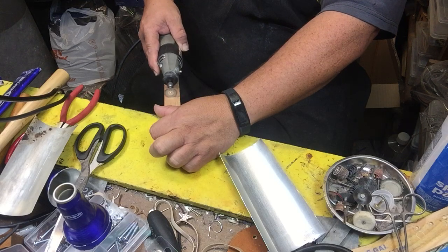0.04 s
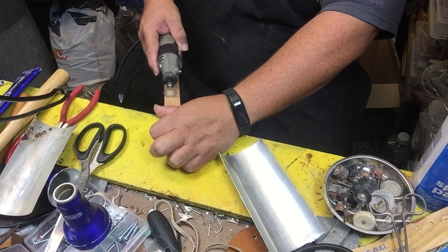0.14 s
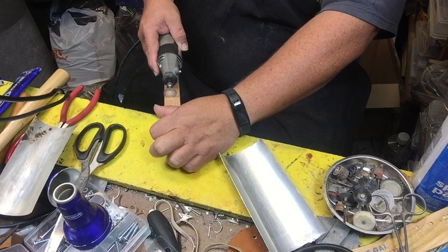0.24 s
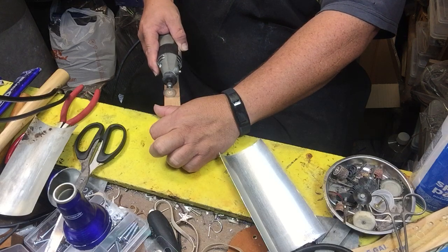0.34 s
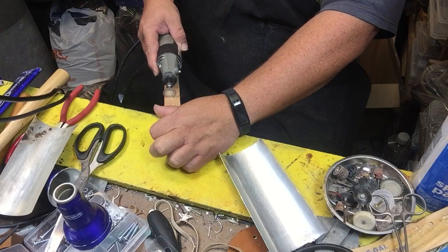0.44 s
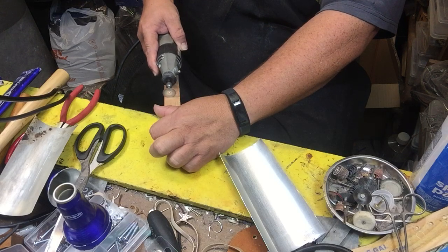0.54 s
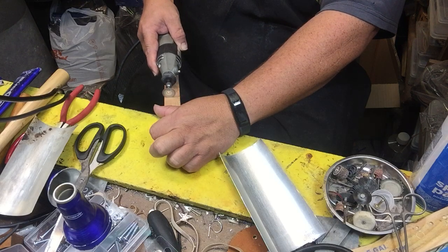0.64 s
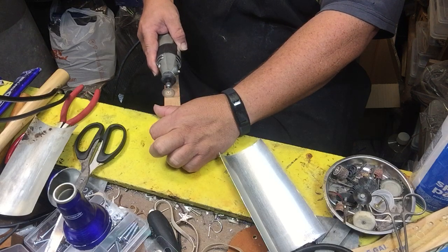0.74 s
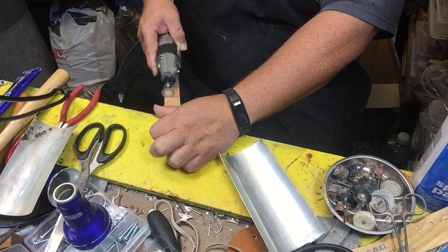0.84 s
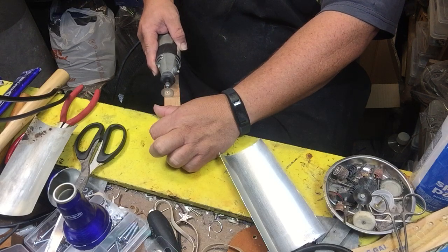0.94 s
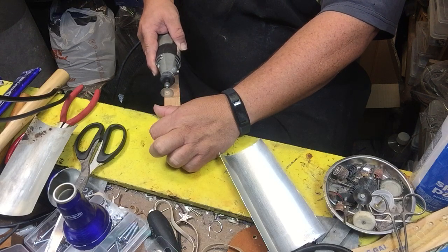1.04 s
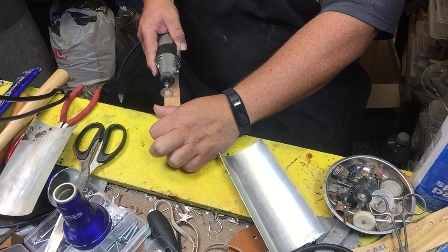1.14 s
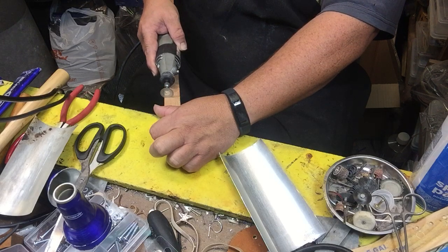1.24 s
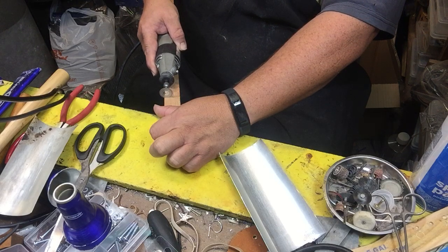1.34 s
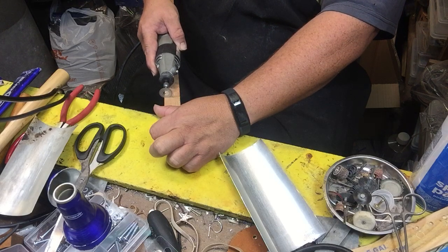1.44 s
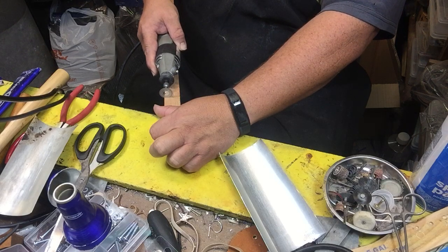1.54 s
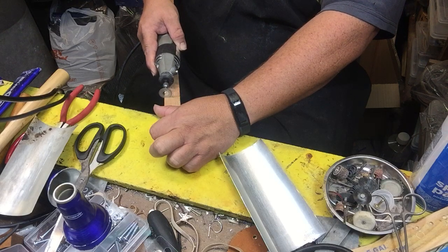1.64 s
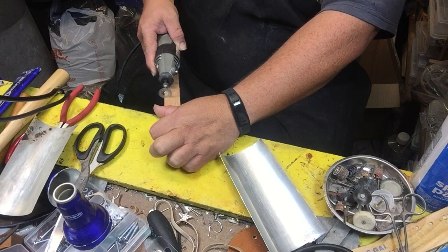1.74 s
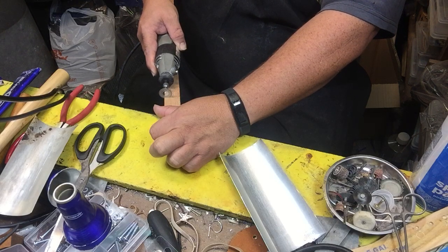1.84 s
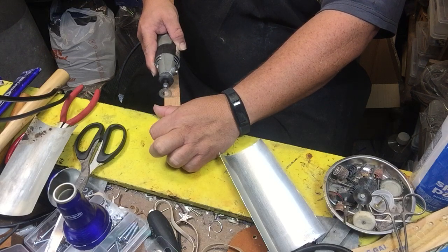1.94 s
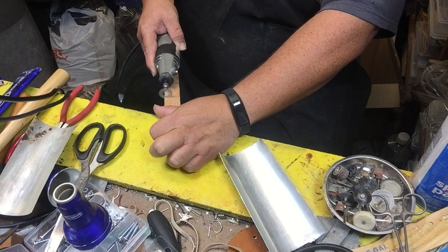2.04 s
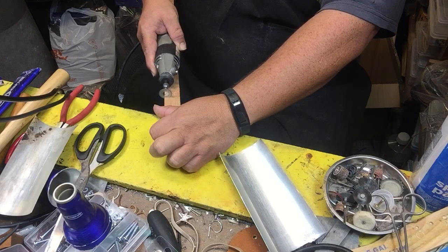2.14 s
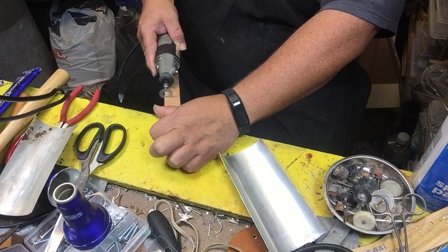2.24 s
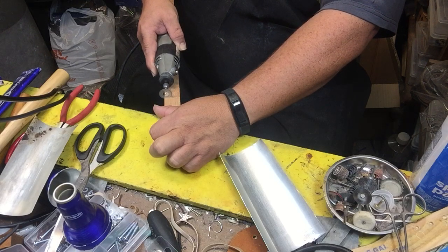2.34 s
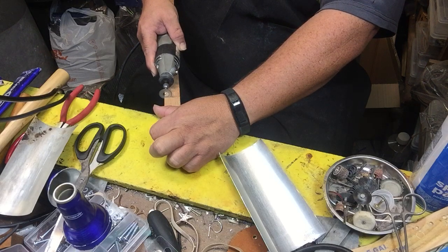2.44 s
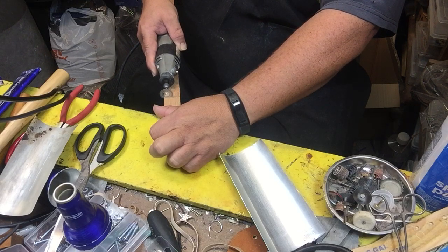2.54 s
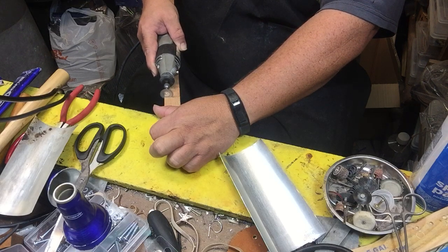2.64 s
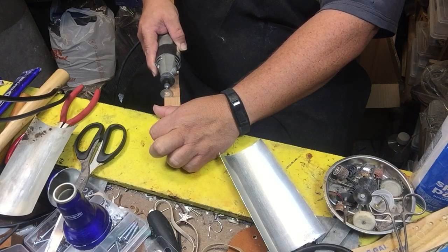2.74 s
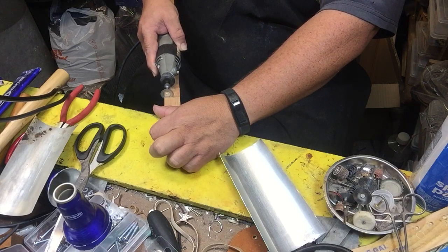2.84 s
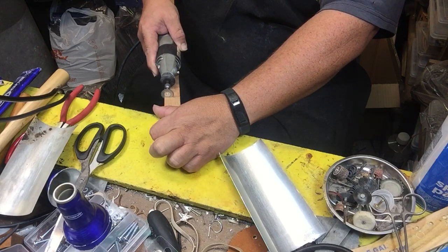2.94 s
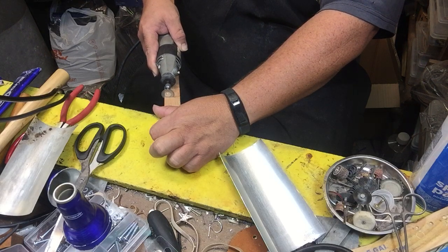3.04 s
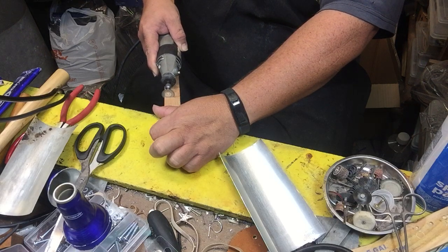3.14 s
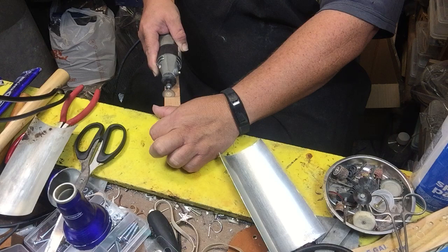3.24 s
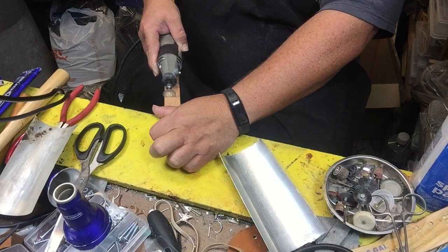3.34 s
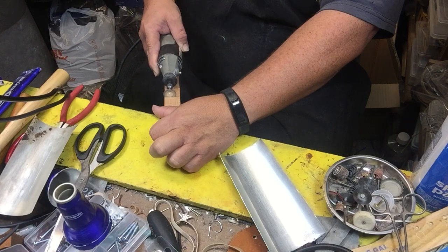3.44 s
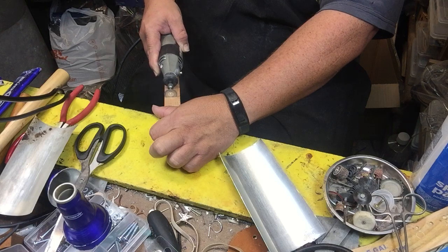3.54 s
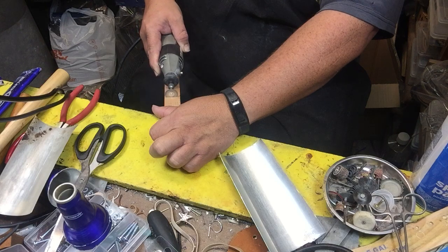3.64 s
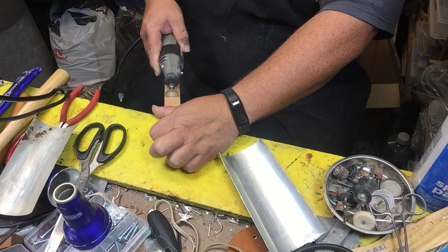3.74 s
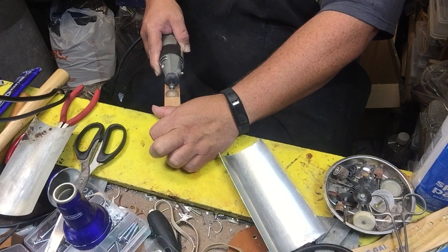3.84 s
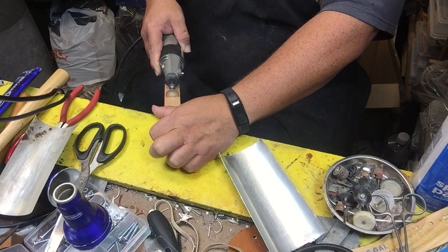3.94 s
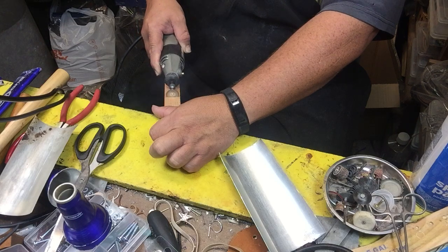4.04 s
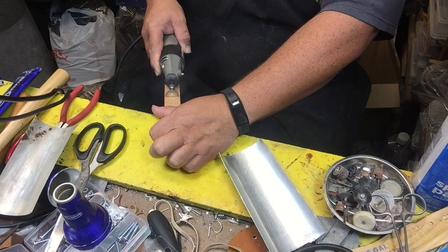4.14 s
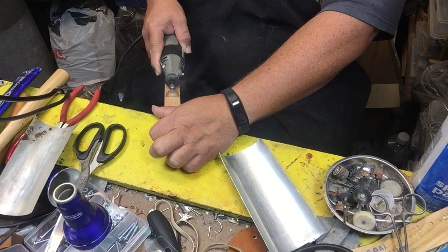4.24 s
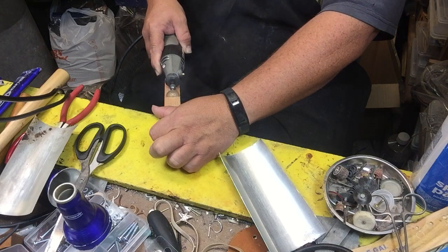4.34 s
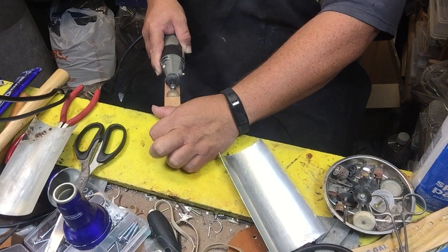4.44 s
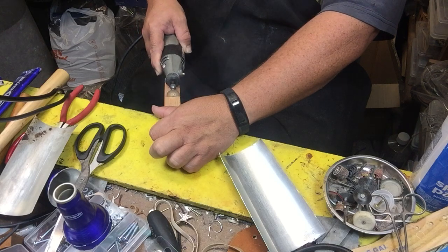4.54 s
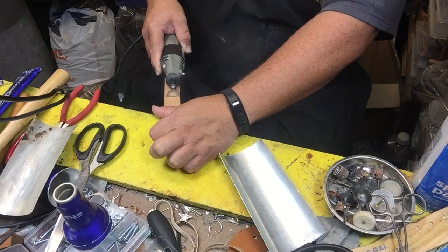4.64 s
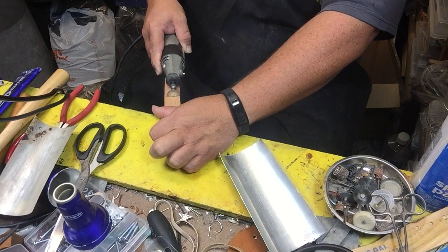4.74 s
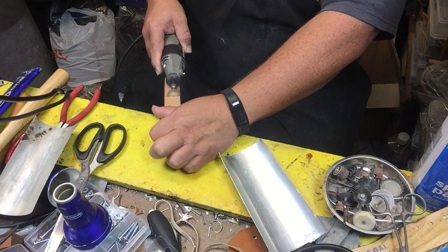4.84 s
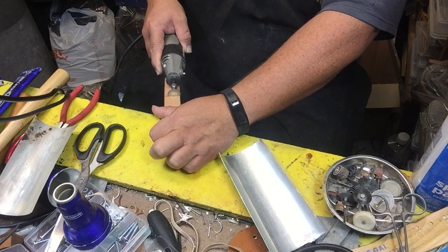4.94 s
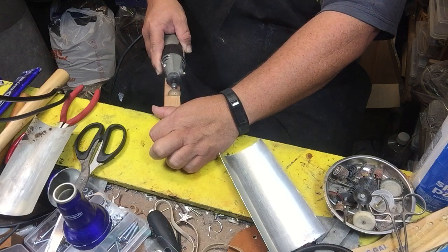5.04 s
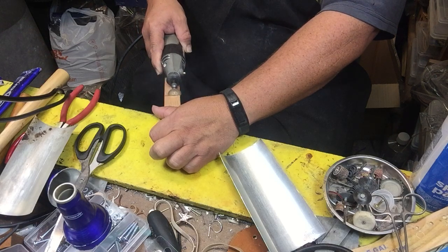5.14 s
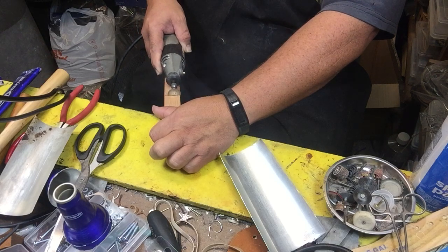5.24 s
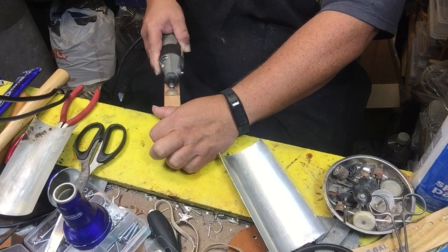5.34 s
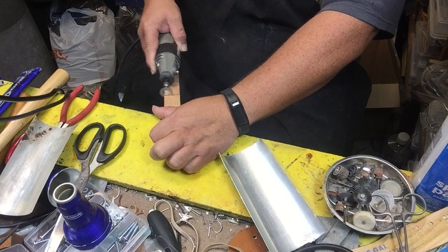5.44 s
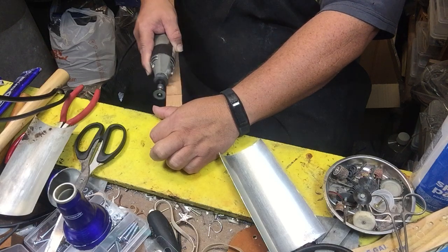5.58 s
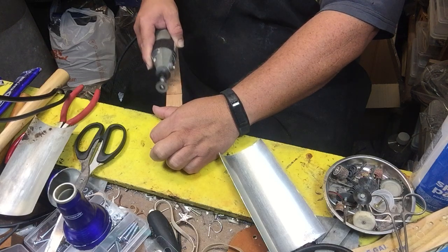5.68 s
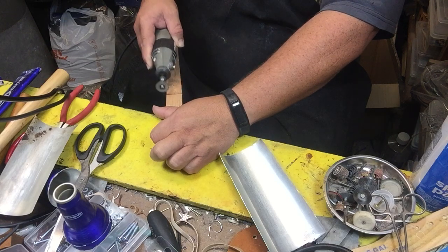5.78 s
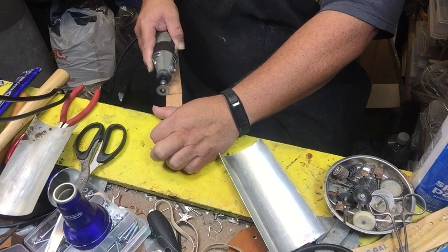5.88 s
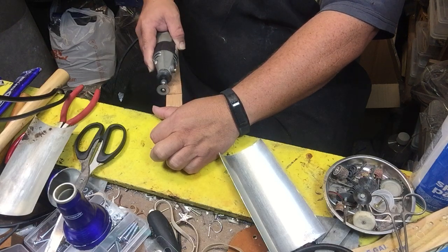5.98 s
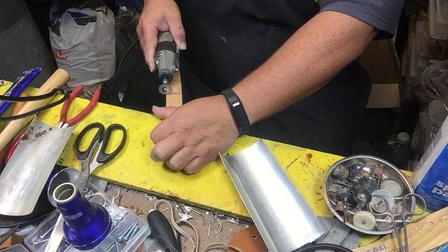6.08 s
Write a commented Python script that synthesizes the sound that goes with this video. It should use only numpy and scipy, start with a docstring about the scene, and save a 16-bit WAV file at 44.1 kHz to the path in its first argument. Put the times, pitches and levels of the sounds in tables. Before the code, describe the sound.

Close up at a workbench, a small rotary tool is already biting into wood with a gritty buzz, a dusty hiss and brief squeals. The motor holds its pitch, then slows and strains under pressure before climbing back. Near the end the bit catches sharply and jumps off the wood, and the whine rises as it touches down again. A faint room rumble lies underneath.

```python
"""A workshop bench, close up, mono: a mains-powered rotary tool grinds a small, held strip of wood.
The same grit sweeps the wood every turn, so the rasp buzzes at shaft speed. The off-centre bit shakes
the strip into a drone; the armature whines over faint room rumble. Under pressure the motor sags
towards a stall, the cut roughens and the brushes spark. Near the end the bit snags, skips off,
spins up freely and lands again."""
import sys
import numpy as np
from scipy import signal
from scipy.fft import rfft, irfft, next_fast_len
from scipy.io import wavfile
from scipy.ndimage import uniform_filter1d, map_coordinates

SR = 44100
rng = np.random.default_rng(int(sys.argv[2]) if len(sys.argv) > 2 else 0)


def master(y):
    """Save y as 16-bit WAV."""
    cut = np.clip(np.atleast_2d(y).T, -1, 1)
    pcm = np.round(cut * 32767)  # scale
    wavfile.write(sys.argv[1], SR, pcm.astype(np.int16))


N = 269495
TIME_S = np.arange(N) / SR

# shaft speed (time [s], speed [Hz])
SHAFT_HZ = [(0.0, 293.7), (0.08, 300.3), (0.22, 291.9), (0.29, 298.2), (0.56, 307), (1.02, 303.2),
            (1.62, 314.4), (2.01, 312.3), (2.19, 307.2), (2.48, 280.8), (2.87, 265.3), (2.94, 260.0),
            (3.16, 228.3), (3.37, 224.3), (3.61, 206.2), (3.9, 200.5), (4.02, 191.6), (4.14, 175.9),
            (4.2, 165.1), (4.27, 145.7), (4.3, 147.1), (4.37, 161), (4.54, 200), (4.65, 223.1),
            (4.71, 235.7), (4.78, 240.9), (5.09, 251), (5.21, 259.2), (5.43, 298.6), (5.46, 303),
            (5.55, 277.0), (5.65, 273.5), (5.68, 277.6), (5.75, 283.3), (5.82, 306), (5.89, 313.3),
            (5.97, 329.2), (6.11, 340.3)]
# bit on wood (start [s], length [s], rasp gain [dB], strip-shaking gain [dB], dust gain [dB])
CONTACTS = [(0, 5.31, 0, 0, 0), (5.31, .158, -1, -15, -3), (5.468, .188, 2.5, 1, 4.5),
            (5.71, .045, -1, -9, -4), (5.98, .2, -1, -7, -5)]
# spectra of the cut (frequency [Hz], relative level [dB])
LOOSE_DUST_DB = [(300, -51), (1000, -6), (2000, -12.5), (5000, -2), (15000, -0.5)]
WOOD_DB = [(300, -23), (480, -5), (612, -21), (736, -43), (915, -3.5), (1120, -10), (1250, -2),
           (1390, -4.5), (1530, 5.5), (1730, -2), (2030, -2), (2300, 25)]
GRIT_DB = [(2200, -11), (2700, 3), (2970, -2.5), (3400, 6), (3800, -7.5), (4100, 8.5), (4480, 3.5),
           (5000, 1), (5400, 0), (6250, -2), (7300, -6), (7750, -11.5), (8250, -4.5), (9500, -5)]
FIZZ_DB = [(7800, -2), (8250, 2), (8900, -1), (9500, -1), (10200, -6), (11300, 1), (12500, 2), (13200, -1),
           (14200, 0), (15000, -2), (15500, 1)]  # fine dust and bit ring
# hard surfaces near the bit (delay [s], gain [ratio])
REFLECTIONS = [(.0013, 0.17), (.0029, -0.094), (.0047, .25), (.0083, 0.13)]
# bit glances, knock fades (time [s], sigma [s], gain [dB])
GLANCES = [(0, 0.044, -4), (0.227, 0.053, -14), (2.315, 0.06, -14), (2.458, .07, -5.5),
           (3.046, 0.044, -6.5), (4.411, 0.085, -2), (5.3, .055, -5.5)]
# narrow rings driven by the grit, mostly where the bit digs in; the 2.8 s row is a tone near 2390 Hz (start
# [s], length [s], centre [Hz], width [Hz], level [dB])
NARROW_RINGS = [(0, 0.036, 4430, 700, -27.5), (0.037, 0.36, 5130, 700, -32.5), (0.104, .13, 4440, 1090, -24.5),
                (0.275, 0.086, 4550, 690, -28.5), (1.25, 0.83, 2056, 499, -35.5), (1.437, .23, 3550, 347, -34),
                (1.972, 0.21, 3500, 613, -29), (2.23, 0.26, 4480, 500, -30), (2.736, 0.082, 5320, 447, -22.5),
                (2.746, 0.12, 4200, 600, -28.5), (2.803, 0.47, 2390, 400, -40), (3.164, 0.59, 4410, 650, -25),
                (3.316, 0.06, 4700, 456, -25), (3.16, 0.573, 2680, 900, -33.5), (3.5, 0.17, 3880, 700, -28),
                (3.727, 0.13, 6300, 690, -25), (3.725, 0.15, 7180, 450, -25.5), (3.758, 0.15, 4220, 350, -26.5),
                (4.19, 0.069, 4410, 703, -29), (4.682, 0.264, 1240, 202, -36), (4.744, 0.14, 6270, 606, -29.5),
                (4.852, 0.39, 3300, 1010, -32.5), (4.936, 0.1, 1455, 200, -31), (4.987, 0.26, 6000, 900, -31),
                (5.068, 0.14, 4355, 700, -27.5), (5.459, .05, 6050, 1000, -25), (5.488, 0.079, 3600, 1100, -21.5),
                (5.722, 0.037, 3570, 896, -29.5), (5.99, 0.1, 3070, 900, -38)]
# off-centre push (shaft multiple, level [dB])
UNBALANCE = [(1, -27), (2, -33), (3, -43.5), (4, -42.5)]
# held strip's response (frequency [Hz], gain [dB])
STRIP_DB = [(150, -4.5), (200, -11), (240, -5.5), (265, -4.5), (295, 1.3), (315, -3), (350, -14),
            (420, -17), (480, -16), (540, -18.5), (590, -20), (612, -14.5), (640, -23), (700, -5.5),
            (770, -20), (835, -3), (905, -13), (942, -1), (1050, -8.5), (1240, -6.5)]
# dips of the drone's fundamental (start [s], length [s], gain [dB])
DROPOUTS = [(2.95, 0.052, -10), (3.754, 0.95, -16.5), (4.7, 0.61, -6.5), (5.238, 0.084, -27)]
# armature tones, via housing and via vents (shaft multiple, base level [dB])
HOUSING_TONES = [(8, -5.5), (16, -4)]
VENT_TONES = [(3, -64.5), (16, -47.5), (18, -68), (24, -74)]
# housing whine (time [s], gain [dB])
WHINE_DB = [(.4, -26), (.62, -30.5), (.88, -26), (1.1, -24.5), (1.27, -30), (2.15, -26.5), (2.4, -23),
            (4.3, -34), (4.8, -44), (5.35, -19.5), (5.66, -30), (5.75, -25), (6.11, -23)]
# spectra of cooling air and room rumble (frequency [Hz], relative level [dB])
AIR_DB = [(300, -35), (800, -11.5), (1600, -3), (2800, -1), (4000, -6), (5200, -19), (6300, -13),
          (7300, 0.5), (8500, -15), (15000, -9)]
ROOM_DB = [(20, -30), (45, -12), (72, -1.5), (100, -5), (170, -15), (300, -3), (500, -9), (1000, -25.5),
           (4000, 1.5), (15000, -18)]
# mains hum (frequency [Hz], level [dB])
HUM_TONES = [(60, -81), (120, -66)]
# edge snags and bench bumps (time [s], level [dB], sigma [s])
SNAGS = [(4.251, -26, 0.011), (5.461, -25.5, 0.0049), (5.645, -19.5, 0.0057), (5.687, -42, 0.0023)]
BUMPS = [(5.465, -57, 0.011), (5.655, -46, 0.013), (5.7, -49, 0.025)]

MAINS_HZ, TOP_HZ = 60, 15720
FREE_HZ, SPIN_UP_S = 373.6, 0.25  # no-load speed, motor time constant
USUAL_DRAG, LEAST_DRAG = 0.22, 0.14  # shares of stall force


def amp(db):
    """Decibels to gain."""
    return 10 ** (np.asarray(db) / 20)


def unit(x):
    """Scale to rms 1."""
    return x / np.sqrt(np.mean(x ** 2) + 1e-20)


def smooth(x, size):
    """Double moving average."""
    return uniform_filter1d(uniform_filter1d(x, size), size)


def even(x):
    """Scale to running rms 1."""
    return x / np.sqrt(np.abs(smooth(x ** 2, 2001)) + 1e-20)


def curve(points):
    """Time table to one value per sample."""
    return np.interp(TIME_S, *np.transpose(points))


def wobble(rate_hz):
    """Random curve, rate_hz knots a second."""
    knots = rng.standard_normal(int(N * rate_hz / SR) + 4)
    return np.interp(TIME_S * rate_hz, np.arange(len(knots)), knots)


def gate(start_s, length_s, edge_s):
    """Trapezoid, 0 to 1."""
    age_s = TIME_S - start_s
    return np.clip(.5 + age_s / edge_s, 0, 1) * np.clip(.5 + (length_s - age_s) / edge_s, 0, 1)


def bell(time_s, sigma_s):
    """Gaussian envelope."""
    return np.exp(-.5 * ((TIME_S - time_s) / sigma_s) ** 2)


def gain_at(spectrum, hz):
    """Gain from a dB table, log frequency axis."""
    knots_hz, db = np.transpose(spectrum)
    return amp(np.interp(np.log(hz + 1), np.log(knots_hz + 1), db))


def filtered(x, response):
    """Apply response(hz) by FFT."""
    size = next_fast_len(N + 8192)
    return irfft(rfft(x, size) * response(np.fft.rfftfreq(size, 1 / SR)), size)[:N]


def noise(spectrum):
    """Coloured noise."""
    return filtered(rng.standard_normal(N), lambda hz: gain_at(spectrum, hz))


def band(x, spectrum, low_hz, high_hz):
    """Steep coloured band at running rms 1."""
    skirts = lambda hz: np.sqrt((1 + (low_hz / (hz + 1)) ** 30) * (1 + (hz / high_hz) ** 30))
    return even(filtered(x, lambda hz: gain_at(spectrum, hz) / skirts(hz)))


def contact():
    """Rasp, strip-shaking and dust gains; zero off the wood."""
    land_s, leave_s = 0.021, 0.028
    gains = np.zeros((3, N))
    for start_s, length_s, *gains_db in CONTACTS:
        landing = np.clip(.5 + (TIME_S - start_s) / land_s, 0, 1)
        leaving = np.clip(.5 + (start_s + length_s - TIME_S) / leave_s, 0, 1)
        gains += amp(gains_db)[:, None] * landing * leaving
    return gains


def drag(speed_hz):
    """Wood drag slows and brakes the motor; in doublings of USUAL_DRAG."""
    accel_hz_per_s = np.gradient(smooth(speed_hz, 2205)) * SR
    load = 1 - (speed_hz + SPIN_UP_S * accel_hz_per_s) / FREE_HZ
    return np.log2(np.maximum(load, LEAST_DRAG) / USUAL_DRAG)


def roughness(speed_hz, torn_lag_s=0.074, groove_s=0.23):
    """0 to 1: high until a groove is worn, and as the motor sags."""
    sag = np.interp(TIME_S - torn_lag_s, TIME_S, 1 - speed_hz / FREE_HZ)
    return np.clip(0.023 + 2.05 * sag ** 2 + 0.3 * np.exp(-TIME_S / groove_s), 0, 1)


def grit(turns, speed_hz, renew_hz, flicker_db, flare_db, drift_rad):
    """Grit force, repeated each turn; the pattern changes as the contact moves."""
    frames, points_per_turn = 600, 1024
    multiples, moments = np.arange(120), np.linspace(0, N - 1, frames)

    def wander(rate_hz, spread=1):
        """Random curve per harmonic, shared by spread neighbours."""
        grid = np.meshgrid(moments * rate_hz / SR, multiples / spread, indexing="ij")
        return map_coordinates(rng.standard_normal((frames, len(multiples))), grid, mode="mirror")

    phase_rad = 2 * np.pi * rng.random(len(multiples)) + drift_rad * wander(renew_hz)
    level = amp(flicker_db * wander(renew_hz) + flare_db * wander(9, spread=2.23))
    above_drone = multiples > len(UNBALANCE)
    in_band = multiples * speed_hz[moments.astype(int), None] < TOP_HZ
    pattern = irfft(above_drone * in_band * level * np.exp(1j * phase_rad), points_per_turn)
    position = [np.linspace(0, frames - 1, N), turns % 1 * points_per_turn]
    return unit(map_coordinates(pattern, position, order=1, mode="grid-wrap"))


def reflect(x):
    """Close echoes ripple the spectrum; gliding harmonics flare and fade."""
    echoes = lambda hz: sum(gain * np.exp(-2j * np.pi * hz * delay_s) for delay_s, gain in REFLECTIONS)
    return filtered(x, lambda hz: 1 + echoes(hz))


def grinding(turns, speed_hz):
    """Repeating grit, skidding grit and loose dust, pressed into the wood each turn."""
    rough = roughness(speed_hz)
    skid = grit(turns, speed_hz, renew_hz=40, flicker_db=5.5, flare_db=2, drift_rad=1.1)
    loose = np.sqrt(rough) * (0.9 * skid + 1.1 * noise(LOOSE_DUST_DB))
    hop = np.exp(0.068 * np.cos(np.pi * turns) + 0.014 * wobble(200))  # every second turn
    slap = unit(sum(np.cos(2 * np.pi * k * turns) for k in range(5, 17)))  # bit's high side
    coarse = grit(turns, speed_hz, renew_hz=4.96, flicker_db=3.5, flare_db=1, drift_rad=0.4)
    push = hop * (np.sqrt(1 - rough) * (0.3 * slap + 1.26 * coarse) + 1.4 * loose)

    slip_turns = .007 * rough * wobble(120)
    fine = grit(turns + slip_turns, speed_hz, renew_hz=10, flicker_db=3.5, flare_db=4, drift_rad=0.5)
    fine *= np.sqrt(1 - rough)
    press = np.exp(0.18 * np.cos(2 * np.pi * turns))
    scratch = reflect((fine + loose) * hop * press)
    doublings = drag(speed_hz)

    def level(base_db, drag_db, flutter_db):
        """Fluttering gain, up drag_db per doubling of drag."""
        return amp(base_db + drag_db * doublings + flutter_db * wobble(22))

    glance = amp(sum(db * bell(time_s, sigma_s) for time_s, sigma_s, db in GLANCES))
    knock = level(-33, drag_db=0.3, flutter_db=1.0) * glance * band(push, WOOD_DB, 400, 1920)
    buzz = level(-36.5, drag_db=2.35, flutter_db=2.3) * band(scratch, GRIT_DB, 2010, 3560)
    squeal = level(-37, drag_db=1.8, flutter_db=4.5) * band(scratch, GRIT_DB, 3940, 4710)
    scrape = level(-31, drag_db=2.7, flutter_db=1.74) * band(scratch, GRIT_DB, 5465, 8150)
    puff = np.exp(0.095 * np.cos(2 * np.pi * turns) + 0.038 * wobble(330))  # dust, once a turn
    hiss = level(-32.5, drag_db=0, flutter_db=1.3) * band(scratch * puff, FIZZ_DB, 9030, SR / 2)
    rasp_gain, strip_gain, dust_gain = contact()
    cut = strip_gain * knock + rasp_gain * (buzz + squeal + scrape) + dust_gain * hiss
    return cut + narrow_rings(fine + 0.11 * loose)


def narrow_rings(force, chatter_db=1.5):
    """The grit drives narrow rings, mostly where the bit digs in."""
    rings = np.zeros(N)
    for start_s, length_s, centre_hz, width_hz, db in NARROW_RINGS:
        swell = gate(start_s, length_s, edge_s=0.36 * length_s)
        on = swell > 0
        b, a = signal.iirpeak(centre_hz, centre_hz / width_hz, SR)
        ring = signal.lfilter(b, a, signal.lfilter(b, a, force[on]))
        rings[on] += amp(db) * swell[on] * even(ring)
    return rings * amp(chatter_db * wobble(28))


def drone(turns, wander_db=4.5):
    """The off-centre bit shakes the strip; overtones wander as the contact moves."""
    dropout_db = sum(db * gate(start_s, length_s, edge_s=0.028) for start_s, length_s, db in DROPOUTS)
    push = np.zeros(N)
    for multiple, db in UNBALANCE:
        change_db = dropout_db if multiple == 1 else wander_db * wobble(7)
        push += np.sqrt(2) * amp(db + change_db) * np.cos(2 * np.pi * multiple * turns)
    _, strip_gain, _ = contact()
    return strip_gain * filtered(push, lambda hz: gain_at(STRIP_DB, hz))


def motor(turns, speed_hz, housing_hz=2410, width_hz=130):
    """Armature tones and cooling air throb each mains half-wave; the housing resonates."""
    ripple = np.cos(2 * np.pi * 2 * MAINS_HZ * TIME_S)
    throb = 1 + 1.29 * ripple
    angle_rad = 2 * np.pi * (turns + 0.0024 * wobble(140))
    tones = lambda rows: throb * sum(amp(db) * np.cos(multiple * angle_rad) for multiple, db in rows)
    housing = lambda hz: 1j * hz * width_hz / (housing_hz ** 2 - hz ** 2 + 1j * hz * width_hz)
    whine = np.sqrt(2) * amp(curve(WHINE_DB)) * filtered(tones(HOUSING_TONES), housing)
    strain = amp(7.7 * (1 - speed_hz / FREE_HZ))  # more current under load
    air = amp(-42) * (1 + 0.52 * ripple) * unit(noise(AIR_DB))
    return whine + strain * tones(VENT_TONES) + air


def workshop():
    """Mains hum and faint room rumble."""
    hum = sum(np.sqrt(2) * amp(db) * np.sin(2 * np.pi * hz * TIME_S) for hz, db in HUM_TONES)
    return hum + amp(-44) * unit(noise(ROOM_DB))


def brushes(turns, speed_hz, multiple=48, stall_db=-29):
    """Brushes spark on the commutator: a fuzzy whistle that tracks the shaft, louder near stall."""
    sparking = np.clip(1 - speed_hz / FREE_HZ, 0, 1) ** 2
    phase_rad = 2 * np.pi * multiple * turns
    fuzz = wobble(450) * np.cos(phase_rad) + wobble(450) * np.sin(phase_rad)
    return amp(stall_db) * sparking * unit(fuzz)


def bursts(events, spectrum):
    """Short noise swells; spectrum: (frequency [Hz], relative level [dB])."""
    swell = sum(amp(db) * bell(time_s, sigma_s) for time_s, db, sigma_s in events)
    return swell * unit(noise(spectrum))


def snags():
    """The bit tears at the strip's edge."""
    return bursts(SNAGS, [(60, -28), (200, -2), (800, -2.5), (1600, 2.5), (2600, 8), (4000, 9.5),
                          (9000, -4), (15000, -35)])


def bench_bumps():
    """The bench takes dull jolts as the hands shift."""
    return bursts(BUMPS, [(20, -11), (55, -2), (120, -7), (400, -1), (2000, -50)])


def scene():
    """One shaft angle drives grit, drone, motor and brushes."""
    speed_hz = curve(SHAFT_HZ) * (1 + 0.00079 * wobble(60))
    turns = np.cumsum(speed_hz) / SR
    mono = grinding(turns, speed_hz) + drone(turns) + motor(turns, speed_hz) + workshop()
    mono += brushes(turns, speed_hz) + snags() + bench_bumps()
    return np.array([mono, mono])


def record(dry):
    """Brick-wall low-pass at TOP_HZ."""
    return np.array([filtered(side, lambda hz: hz < TOP_HZ) for side in dry])


dry = scene()
out = record(dry)
master(out)
```